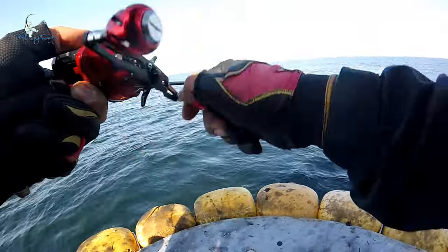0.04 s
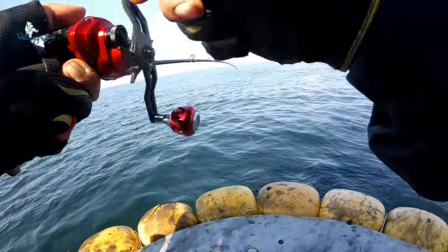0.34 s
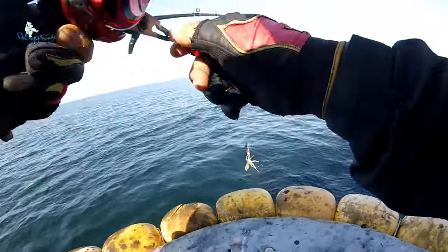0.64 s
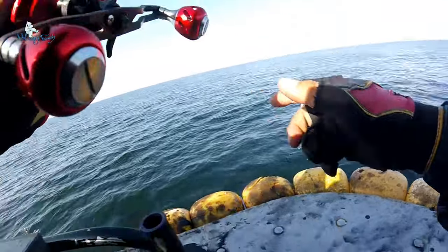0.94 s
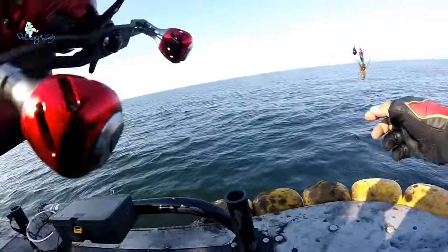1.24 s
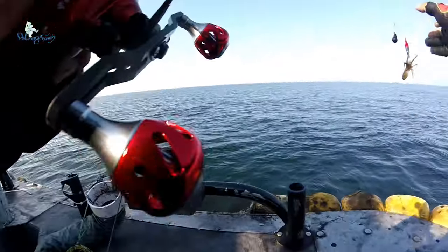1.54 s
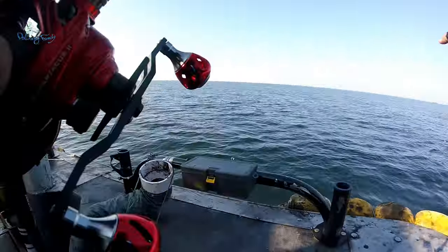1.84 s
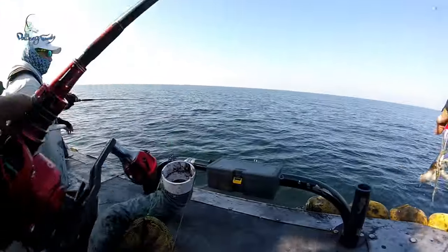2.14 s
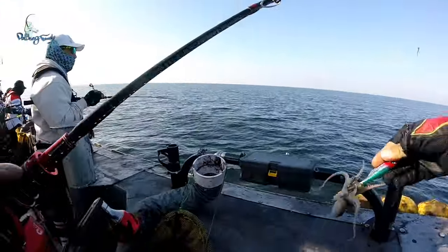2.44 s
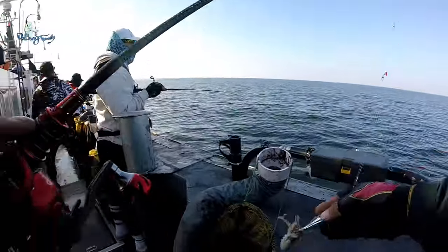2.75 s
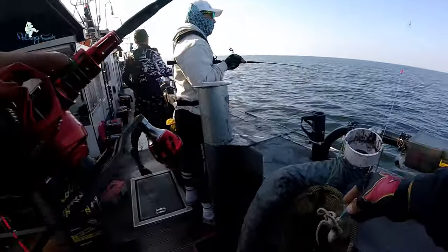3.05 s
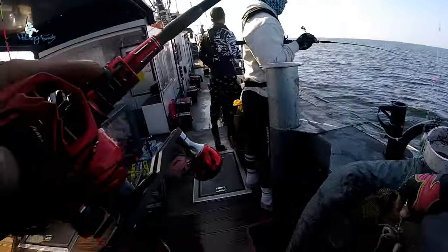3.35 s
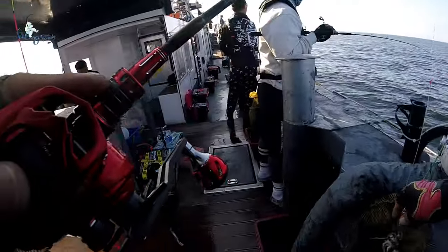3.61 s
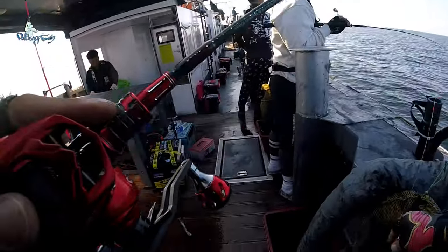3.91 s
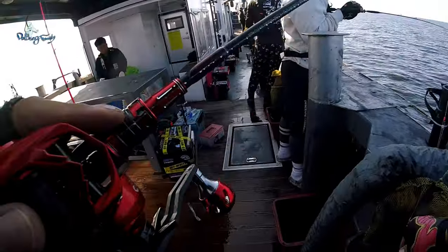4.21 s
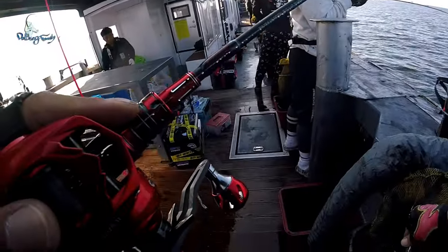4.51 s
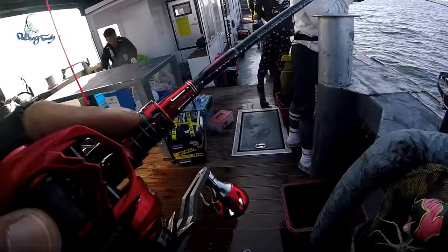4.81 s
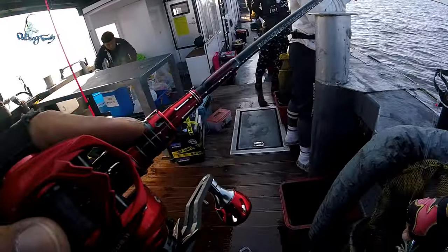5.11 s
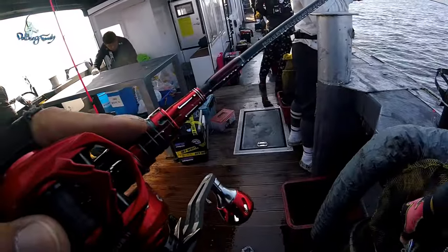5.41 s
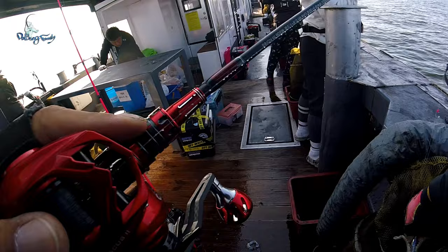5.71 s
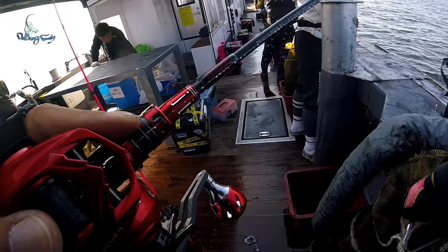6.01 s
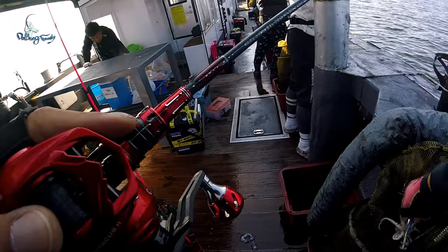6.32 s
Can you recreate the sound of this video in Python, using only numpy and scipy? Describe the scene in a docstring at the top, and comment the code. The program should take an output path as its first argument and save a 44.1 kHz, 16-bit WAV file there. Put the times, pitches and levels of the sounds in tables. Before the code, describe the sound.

On the deck of a fishing boat, the low drone of an idling diesel runs throughout, under a breeze and a faint fizz of ripples. Early on there is a brief, soft reel whine, a gust on the microphone and one sharp snap of the reel, followed by splashing slaps against the hull. Then the machinery becomes fuller, with close sleeve rustles, scattered light tackle ticks and a final short metallic jingle.

```python
"""A six-cylinder diesel idles below the deck of a fishing boat; its periodic firings drone and knock.
Wind eddies buffet the microphone, ripples fizz, and waves slap the hull, exciting trapped air and plating.
Close by, an angler's reel whines, a jacket rustles by friction, and drops ping. Small impacts set the
tackle ringing: it ticks, snaps once and finally jingles. The machinery grows as the angler turns to it."""
import sys
import numpy as np
from scipy import signal
from scipy.fft import rfft, irfft
from scipy.io import wavfile
from scipy.ndimage import uniform_filter1d

SR = 44100
rng = np.random.default_rng(int(sys.argv[2]) if len(sys.argv) > 2 else 0)


def wav_record(signal):
    """Record a signal, one row per channel, as 16-bit PCM in the file named by sys.argv[1]."""
    frames = np.transpose(np.atleast_2d(signal))
    bounded = np.clip(frames, -1, 1)
    # unit amplitude maps onto the largest positive 16-bit level
    quanta = np.round(bounded * 32767).astype(np.int16)
    wavfile.write(sys.argv[1], SR, quanta)


N = 284886
T = np.arange(N) / SR
FIRING_HZ, CYLINDERS = 30.04, 6
CONTACT_HZ = 10500  # soft contact limits the treble of the tackle

# Exhaust overtones and the lines between them: (order [multiple of the cycle rate], relative level [dB])
EXHAUST_ORDERS = [(14, -30.5), (15, -34.5), (16, -40), (17, -45.5), (18, -35), (19, -40), (20, -40.5),
                  (23, -44), (24, -39), (27, -42.5), (29, -36.5), (30, -40), (31, -46), (32, -45.5),
                  (36, -45), (39, -51.5), (42, -51.5), (48, -53), (54, -49), (78, -52.5), (84, -53.5),
                  (90, -53), (159, -62), (174, -66), (176, -65), (235, -66)]
# The octave of the exhaust note, swelling and sinking as the angler moves: (time [s], level [dB])
OCTAVE_LEVEL = [(0, -27.5), (0.6, -36), (0.9, -35), (1.55, -20), (1.9, -22), (2.2, -25.5), (2.65, -26),
                (3.0, -20.5), (3.35, -30.5), (4.3, -21), (4.75, -20), (5.2, -24), (6.46, -25)]
# One exhaust line that booms most on the seaward side: (time [s], level [dB])
BOOM_LEVEL = [(0, -30.5), (1.0, -33.5), (2.6, -37), (6.46, -38)]
# Spectrum of clatter and combustion noise: (frequency [Hz], relative density [dB])
MACHINERY_SPECTRUM = [(90, -3), (150, 2), (195, 5), (240, -2.5), (275, 1), (320, -3.5), (370, -4),
                      (440, -5.5), (500, -11.5), (570, -15), (690, -15.5), (800, -15.5), (1100, -22.5),
                      (1600, -29.5), (2100, -28), (3300, -34), (7000, -58.5)]
# Steady tones beside the engine: (frequency [Hz], relative level [dB])
HUM_TONES = [(272.2, -48), (362.7, -48)]
# Spectra of the breeze and the gust: (frequency [Hz], relative density [dB])
BREEZE_SPECTRUM = [(10, -30), (20, -2), (33, -14.5), (39, -0.5), (54, -2.5), (75, -13), (115, -13.5),
                   (170, -24.5), (260, -26), (500, -59), (1500, -74)]
GUST_SPECTRUM = [(10, -30), (25, -7.5), (54, 0.5), (80, -2.5), (115, -9), (170, -15), (260, -29.5),
                 (500, -55), (1500, -77)]
# The strongest eddies of the gust: (time [s], level before windowing [dB], frequency [Hz])
EDDIES = [(0.916, -8.5, 62), (0.949, -16, 76), (1.05, -11.5, 95), (1.11, -9.5, 134), (1.152, -10, 93),
          (1.224, -11, 76.4), (1.29, -13.5, 84)]
# Spectrum of fizzing ripples: (frequency [Hz], relative density [dB])
RIPPLE_SPECTRUM = [(300, 20), (1500, 4.5), (2600, -22), (4000, 3), (4900, 8), (5700, 5.5), (6700, -1),
                   (9400, -2.5), (11000, -13.5), (13000, -26), (15000, -42)]
# Reel whine, higher with each push of the crank: (time [s], frequency [Hz], level [dB])
WINDING = [(0.015, 1980, -48), (.04, 1980, -52), (.052, 2100, -63), (.11, 2470, -63), (.165, 2460, -63),
           (.205, 2260, -57), (.25, 2200, -66), (.31, 2540, -63), (.4, 2607, -64), (.44, 2330, -78),
           (.51, 2140, -69), (.555, 2196, -54), (.58, 2450, -63), (.605, 2260, -58)]
# Spectrum of rubbing fabric, shared by other hisses: (frequency [Hz], relative density [dB])
HISS_SPECTRUM = [(700, -10), (1800, 1.5), (2800, 1), (4000, -3), (5400, 2.5), (6800, -8), (9700, -9.5),
                 (11000, -29.5), (15000, -37.5)]
# Soft hisses: jacket rubs, the reel's whirr at the start, and spray after the slaps:
# (time [s], level [dB], rise [s], decay [s])
SOFT_HISSES = [(.1, -63, 0.29, 0.21), (.56, -60.5, 0.03, 0.18), (.79, -58, 0.069, 0.026),
               (1.228, -47.5, 0.048, 0.041), (2.0, -51, 0.12, 0.047), (2.21, -52, 0.096, 0.19),
               (2.72, -42, 0.11, 0.17), (3.23, -50, .02, 0.028), (3.481, -51, .016, 0.02),
               (3.9, -53.5, 0.093, 0.096), (4.275, -45, 0.06, 0.11), (4.729, -37, 0.004, 0.02),
               (4.907, -48, 0.0063, 0.014), (4.962, -51, 0.0036, 0.017), (5.134, -40, 0.0031, 0.026),
               (5.473, -48.5, 0.015, 0.018), (5.715, -46.5, 0.034, 0.039), (6.353, -47.5, .002, 0.032),
               (6.412, -42.5, .0076, 0.046)]
# Gliding rasps of the sleeve, and one quick falling zip of fishing line:
# (time [s], level [dB], rise [s], decay [s], frequency [Hz], glide [octaves/s], bandwidth [Hz])
GLIDING_RASPS = [(2.638, -43, 0.023, 0.06, 3290, -2, 1000), (2.75, -42, 0.06, 0.055, 3280, 1, 350),
                 (2.765, -46.5, .045, .06, 2306, -0.5, 1300), (3.461, -40, 0.0031, .007, 5930, -24, 700),
                 (3.483, -44, 0.02, 0.022, 3205, -8, 2980), (3.493, -45, 0.022, .015, 1498, -7.5, 2000)]
# Ticks of line and swivels: (time [s], relative peak [dB], frequency [Hz], bandwidth [Hz])
LINE_TICKS = [(.164, -43, 9600, 1500), (.262, -44, 9600, 1500), (.552, -46, 4700, 2510),
              (.587, -46, 3950, 1500), (.639, -35.5, 2860, 3480), (.64, -52, 5600, 2500),
              (0.674, -43.5, 2580, 2400), (1.075, -35, 3000, 2200), (1.613, -35.5, 1850, 2400),
              (1.867, -48, 2000, 2000), (2.025, -40, 1900, 2400), (2.238, -31, 3900, 4500),
              (2.94, -45, 9000, 1500), (3.038, -37, 8300, 2520), (3.039, -41, 5200, 900),
              (3.055, -41, 6100, 900), (3.072, -41, 5600, 3500), (3.091, -38.5, 6170, 3500),
              (3.15, -50, 8700, 1200), (3.289, -37.5, 4880, 3000), (3.338, -42, 5060, 1500),
              (3.821, -42.5, 8000, 1530), (3.889, -47, 8800, 1200), (3.944, -51, 8100, 900),
              (3.966, -48, 9500, 1500), (4.114, -37.5, 7550, 3500), (4.814, -39, 4930, 900),
              (4.869, -41, 7950, 1500), (4.934, -42, 6500, 2000), (5.05, -46, 4850, 700),
              (5.202, -33, 4900, 2200), (5.329, -37, 7200, 2500), (6.286, -45, 6200, 1200)]
# Waves striking the hull: (time [s], level [dB], rise [s], cavity frequency [Hz], hardness [dB])
WAVE_SLAPS = [(0.235, -31.5, 0.0065, 590, -10.5), (0.252, -24, 0.014, 267, -20),
              (0.428, -29.5, 0.011, 255, -28), (0.46, -34, 0.015, 286, -7),
              (1.423, -28.5, 0.0054, 517, -12), (1.453, -21, 0.0069, 730, -3.5),
              (1.47, -25.5, 0.02, 312, -5.5), (1.689, -23.5, 0.0078, 690, -2.5),
              (1.918, -23.5, 0.0056, 566, -3)]
# Modes of the hull plating: (frequency [Hz], bandwidth [Hz], relative gain [dB])
HULL_MODES = [(285, 21, 6.5), (403, 19, 6), (510, 14, 2), (618, 25, 3), (703, 10, 1), (838, 36, 1.5),
              (1016, 68, -5.5), (1205, 43, -8.5), (2150, 670, -27)]
# Spectrum of thrown spray: (frequency [Hz], relative density [dB])
SPRAY_SPECTRUM = [(500, 12.5), (1300, -7), (2300, 8), (3000, 5), (4000, 2), (5500, 4), (6800, -9),
                  (9500, -14.5), (11000, -39), (15000, -39)]
# Large bubbles in the slaps: (time [s], peak [dB], frequency [Hz])
SLAP_BUBBLES = [(.245, -34, 638), (.25, -28, 272), (.425, -24.5, 284), (1.455, -24.5, 1110),
                (1.457, -37, 1145), (1.455, -29, 840), (1.465, -22, 316.6), (1.69, -36, 1045),
                (1.916, -29.5, 713)]
# Spectrum of water falling back: (frequency [Hz], relative density [dB])
PATTER_SPECTRUM = [(250, 6.5), (750, 4), (1200, -4.5), (1600, -8), (2400, -12.5), (3800, -16), (5400, -12),
                   (6800, -18), (9500, -20.5), (11200, -43)]
# Blows of the reel snapping shut: (time [s], peak before low-pass [dB])
REEL_BLOWS = [(1.0797, -8), (1.0818, -14), (1.084, -32)]
# Modes of the reel: (frequency [Hz], relative level [dB], 60 dB decay time [s])
REEL_MODES = [(950, -17, .006), (2080, 2, 0.0019), (3540, 4, 0.0023), (5270, 11, 0.0022),
              (7760, 7.5, 0.0028), (12000, 2, 0.0015), (13800, -3, .002)]
# Surges of foam along the side: (time [s], level [dB], rise [s], decay [s], hold [s])
FOAM_SURGES = [(2.21, -56, 0.07, 0.12, 0.0095), (2.675, -33, 0.053, 0.094, 0.033),
               (2.75, -35.5, .02, 0.038, 0.022), (2.83, -32.5, 0.022, 0.019, .015)]
# Spectrum of foam: (frequency [Hz], relative density [dB])
FOAM_SPECTRUM = [(200, 3.5), (400, 3), (750, 2), (1020, -5), (1200, -1), (1600, -14.5), (2300, -7),
                 (2800, -13), (3250, -11.5), (3900, -14), (5300, -13.5), (6800, -26), (9500, -40),
                 (11200, -57)]
# Touches of a swivel on the sinker: (time [s], peak before low-pass [dB])
SWIVEL_TOUCHES = [(6.412, -26), (6.417, -45), (6.425, -29), (6.435, -35), (6.451, -34)]
# Modes of the swivel: (frequency [Hz], relative level [dB], 60 dB decay time [s])
SWIVEL_MODES = [(5130, 7, 0.059), (5240, -7, 0.049), (5630, 6, 0.051), (6010, -1, 0.053), (6470, -12, .03),
                (7600, -5, 0.05), (8250, -8, 0.04), (9900, -10, 0.043)]


def undb(db):
    """Convert decibels to an amplitude ratio."""
    return 10 ** (np.asarray(db) / 20)


def unit(x):
    """Normalise to rms 1."""
    return x / np.sqrt(np.mean(x ** 2))


def curve(rows):
    """Linear interpolation of (time [s], value) rows."""
    return np.interp(T, *np.transpose(rows))


def noise():
    """Gaussian white noise."""
    return rng.standard_normal(N)


def wander(rate):
    """Smoothed random modulation of rms 1, with `rate` new values a second."""
    k = int(SR / rate)
    steps = np.repeat(noise()[:N // k + 1], k)
    return unit(uniform_filter1d(uniform_filter1d(steps, k), k)[:N])


def colour(x, spectrum):
    """Spectral shaping by a (frequency [Hz], level [dB]) outline, to rms 1."""
    hz, db = np.transpose(spectrum)
    bins = np.maximum(np.fft.rfftfreq(N, 1 / SR), 1)
    gain = undb(np.interp(np.log(bins), np.log(hz), db))
    return unit(irfft(rfft(x) * gain, N))


def resonate(x, hz, width):
    """A second-order resonance with gain 1 at its centre."""
    return signal.lfilter(*signal.iirpeak(hz, hz / width, fs=SR), x)


def resonate_twice(x, hz, width):
    """Two equal resonances in cascade, for steeper skirts."""
    return resonate(resonate(x, hz, width), hz, width)


def lowpass(x, hz):
    """A fourth-order low-pass."""
    return signal.sosfilt(signal.butter(4, hz, fs=SR, output="sos"), x)


def grains(rate, spread_db):
    """Shot noise: about `rate` tiny impacts a second, of unequal size."""
    size = undb(spread_db * np.minimum(rng.exponential(size=N), 5))
    return noise() * size * (rng.random(N) < rate / SR)


def swell(at, rise, decay, hold=0):
    """An envelope with a Gaussian rise to 1, an optional hold and an exponential decay."""
    return np.exp(-(np.minimum(T - at, 0) / rise) ** 2 - np.maximum(T - at - hold, 0) / decay)


def swells(rows):
    """Power sum of (time [s], level [dB], rise [s], decay [s], optional hold [s]) envelopes."""
    return np.sqrt(sum((undb(db) * swell(at, *shape)) ** 2 for at, db, *shape in rows))


def ring(modes, rise=1e-5):
    """Free vibration of damped modes after a blow that builds over `rise` seconds."""
    t = T[:SR // 4]
    ringing = sum(undb(db) * np.sin(2 * np.pi * hz * t) * 1000 ** (-t / t60) for hz, db, t60 in modes)
    return ringing * (1 - np.exp(-(t / rise) ** 2))


def add(out, at, peak_db, sound):
    """Superpose a sound at a given time and peak level."""
    part = out[int(at * SR):][:len(sound)]
    part += undb(peak_db) * sound[:len(part)] / np.abs(sound).max()


def facing_db(seaward_db=-5, inboard_db=-0.11, midpoint_s=2.55, turn_s=1.73):
    """Acoustic shadow: the body shades the machinery less as the angler turns from sea to deckhouse."""
    turned = (1 + np.tanh(2 * (T - midpoint_s) / turn_s)) / 2
    return seaward_db + (inboard_db - seaward_db) * turned


def exhaust(cycle, puff_lag_s=0.004087, boom_order=21, coherent_below_hz=200, waver_db=1.25):
    """Harmonic series: each firing emits a puff of gas; unequal cylinders add lines between overtones."""
    puff = cycle - puff_lag_s * FIRING_HZ / CYLINDERS
    out = undb(-19 + 0.31 * facing_db()) * np.cos(2 * np.pi * CYLINDERS * cycle)
    out += undb(curve(OCTAVE_LEVEL)) * np.cos(2 * np.pi * CYLINDERS * (cycle + puff))
    out += undb(curve(BOOM_LEVEL)) * np.cos(2 * np.pi * (boom_order * puff + rng.random()))
    shadow_db = 0.73 * facing_db()
    for order, db in EXHAUST_ORDERS:
        # Only low firing overtones stay in phase; the hull scatters the higher ones.
        scattered = order % CYLINDERS > 0 or order * FIRING_HZ / CYLINDERS > coherent_below_hz
        phase = 2 * np.pi * (order * puff + rng.random() * scattered)
        out += undb(db + shadow_db + waver_db * wander(2.1)) * np.cos(phase)
    return np.sqrt(2) * out


def knocks(cycle, scatter_db=6, hull_cutoff_hz=445):
    """Structure-borne sound: uneven firings thud through the hull and rattle loose fittings."""
    lag, jitter, decay = 0.023, 0.12, 0.27  # fractions of the firing period
    firing = CYLINDERS * cycle - lag + jitter * wander(FIRING_HZ)
    strength = undb(scatter_db * rng.uniform(-1, 1, N))[np.floor(firing).astype(int)]
    force = lowpass(noise() * strength * np.exp(-(firing % 1) / decay), hull_cutoff_hz)
    thud = unit(resonate_twice(force, hz=165, width=150))
    rattle = unit(resonate_twice(force, hz=395, width=110))
    return undb(-43) * thud + undb(-46 + 1.4 * facing_db()) * rattle


def machinery(cycle, combustion_db=7, flicker_db=1.8):
    """Periodic and random noise: valves and pistons repeat each cycle amid combustion; injectors ring."""
    cycle_samples = int(SR * CYLINDERS / FIRING_HZ)
    clatter = noise()[(cycle % 1 * cycle_samples).astype(int)]
    rumble = colour(clatter + undb(combustion_db) * noise(), MACHINERY_SPECTRUM)
    injectors = unit(resonate(resonate(noise(), hz=2355, width=220), hz=2340, width=290))
    injectors *= undb(flicker_db * wander(24))
    # The body shades short wavelengths more than long ones.
    return undb(-34 + facing_db()) * rumble + undb(-58 + 7 * facing_db()) * injectors


def hum(waver_db=3):
    """Beating: two thin tones, as of a pump, interfere with nearby engine overtones."""
    return sum(undb(db + facing_db() + waver_db * wander(5)) * np.sqrt(2) * np.sin(2 * np.pi * hz * T)
               for hz, db in HUM_TONES)


def wind(breeze_db=-27.5, gust_db=-22, gust_flutter_db=3, flutter_db=1, eddy_cycles=0.67):
    """Turbulent pressure: a breeze and one gust rumble at the microphone; each eddy pushes and pulls."""
    gust = swell(at=0.915, rise=0.02, decay=0.26, hold=0.49)
    gust *= undb(gust_db + gust_flutter_db * wander(27.98))
    breeze = undb(breeze_db) * colour(noise(), BREEZE_SPECTRUM)
    out = (breeze + gust * colour(noise(), GUST_SPECTRUM)) * undb(flutter_db * wander(9.1))
    for at, db, hz in EDDIES:
        turns = (T - at) * hz
        out -= undb(db) * np.sin(2 * np.pi * turns) * np.exp(-(turns / eddy_cycles) ** 2)
    return out


def ripples(swell_db=0.6):
    """Incoherent summation: countless ripples merge into a nearly steady fizz."""
    fizz = colour(noise() + grains(rate=2200, spread_db=5), RIPPLE_SPECTRUM)
    return fizz * undb(-53.5 + swell_db * wander(5.5) + 0.5 * facing_db())


def reel_whine(octave_db=-4, flicker_db=4, jitter=0.036, roughen_s=0.1):
    """Frequency modulation: a tone and its octave follow the winding speed; jitter makes them scratchy."""
    times, hz, db = np.transpose(WINDING)
    roughness = np.clip((T - times[0]) / roughen_s, 0, 1)
    pitch = np.interp(T, times, hz) * (1 + jitter * roughness * wander(300))
    phase = 2 * np.pi * np.cumsum(pitch) / SR
    envelope = undb(np.interp(T, times, db) + flicker_db * wander(62))
    envelope *= swell(times[0], rise=0.006, decay=0.025, hold=np.ptp(times))
    return envelope * (np.sin(phase) + undb(octave_db) * roughness * np.sin(2 * phase))


def hisses():
    """Shot noise: jacket fabric slips in tiny steps; the same hiss gives the reel's whirr and late spray."""
    fidget = undb(-64 + 2.6 * facing_db() + 1.5 * wander(10))  # faint stirring, more after the turn
    hiss = colour(grains(rate=9000, spread_db=1.5), HISS_SPECTRUM)
    return hiss * np.hypot(swells(SOFT_HISSES), fidget)


def line_ticks(gain_db=-1, decay_cycles=150):
    """Damped resonance: line and swivel ticks fade in a set number of cycles, so low ones last longer."""
    out = np.zeros(N)
    t = T[:SR // 10]
    for at, db, hz, width in LINE_TICKS:
        scratch = noise()[:len(t)] * 1000 ** (-t * hz / decay_cycles)
        add(out, at, db + gain_db, resonate_twice(scratch, hz, width))
    return lowpass(out, CONTACT_HZ)


def wave_slaps(decay_s=0.033, splash_db=-13.5, smack_db=-24):
    """Cavity resonance: each wave traps air; harder ones drive the plating more and throw more spray."""
    out = np.zeros(N)
    spray = colour(noise(), SPRAY_SPECTRUM)
    push = lowpass(noise(), hz=2600)
    plating = unit(sum(undb(db) * resonate(push, hz, width) for hz, width, db in HULL_MODES))
    for at, db, rise, hz, hardness_db in WAVE_SLAPS:
        cavity = unit(resonate_twice(noise(), hz, width=0.71 * hz))
        envelope = swell(at, rise, decay_s)
        thump = unit((cavity + undb(hardness_db) * plating) * envelope) * np.sqrt(np.mean(envelope ** 2))
        splash = undb(splash_db) * swell(at, rise, 1.5 * decay_s)
        smack = undb(smack_db) * swell(at, rise=0.003, decay=decay_s)  # the bright first contact
        out += undb(db) * (thump + undb(hardness_db) * spray * np.hypot(splash, smack))
    return out


def bubbles(rise_s=0.0068, decay_s=0.028):
    """Volume oscillation: large bubbles pinched off by a slap ring briefly at their natural frequency."""
    return sum(undb(db) * swell(at, rise_s, decay_s) * np.sin(2 * np.pi * (hz * T + rng.random()))
               for at, db, hz in SLAP_BUBBLES)


def patter(gain_db=-18, lag_s=0.062, rise_s=0.12, decay_s=0.35):
    """Shot noise: water thrown by each slap falls back as many small impacts."""
    showers = [(at + lag_s, db + hardness_db + gain_db, rise_s, decay_s)
               for at, db, _, _, hardness_db in WAVE_SLAPS]
    return colour(grains(rate=7000, spread_db=2.5), PATTER_SPECTRUM) * swells(showers)


def reel_snap(rise_s=0.00053, buzz_db=-31):
    """Impact excitation: the reel shuts and its modes ring; loose parts buzz after the hardest blow."""
    out = np.zeros(N)
    for at, db in REEL_BLOWS:
        add(out, at, db, ring(REEL_MODES, rise_s))
    hardest_at = max(REEL_BLOWS, key=lambda blow: blow[1])[0]
    buzz = colour(noise(), HISS_SPECTRUM) * swell(hardest_at + rise_s, rise=0.0012, decay=0.0043)
    return lowpass(out, CONTACT_HZ) + undb(buzz_db) * buzz


def droplets(count=60, start_s=1.9, low_hz=4700, high_hz=10000, t60=0.049):
    """Impact resonance: scattered drops ping on deck and water, each in its own narrow band."""
    out = np.zeros(N)
    t = T[:SR // 20]
    for when, pitch, size in rng.random((count, 3)):
        hz = low_hz * (high_hz / low_hz) ** pitch
        splat = noise()[:len(t)] * 1000 ** (-t / t60)
        db = -55 - 3 * np.log(max(size, 0.05))  # most drops are tiny, a few stand out
        add(out, start_s + when * (T[-1] - start_s), db, resonate_twice(splat, hz, width=hz / 8))
    return out


def foam(flicker_db=2.5):
    """Amplitude-modulated shot noise: foam washes along the hull in surges."""
    froth = colour(grains(rate=20000, spread_db=1.5), FOAM_SPECTRUM)
    return froth * swells(FOAM_SURGES) * undb(flicker_db * wander(50))


def rasps():
    """Sliding friction: the sleeve rasps and the fishing line zips once, each in a gliding noise band."""
    out = np.zeros(N)
    for at, db, rise, decay, hz, glide, width in GLIDING_RASPS:
        pitch = hz * 2 ** np.clip(glide * (T - at), -1, 1)
        carrier = np.cos(2 * np.pi * np.cumsum(pitch) / SR)
        band = unit(lowpass(noise(), width / 2) * carrier)
        out += undb(db) * band * swell(at, rise, decay)
    return out


def swivel_jingle(skid_s=0.0075):
    """Inharmonic modes: a swivel skids on the sinker at each touch and rings on."""
    out = np.zeros(N)
    t = T[:SR // 10]
    for at, db in SWIVEL_TOUCHES:
        skid = noise()[:len(t)] * np.exp(-t / skid_s)
        add(out, at, db, signal.fftconvolve(skid, ring(SWIVEL_MODES)))
    return lowpass(out, CONTACT_HZ)


def scene(speed_drift=0.00046, first_firing_s=0.004):
    """Superposition: all sources sum at one microphone, while the governed engine barely drifts."""
    clock = np.cumsum(1 + speed_drift * wander(2.013)) / SR
    cycle = (clock - first_firing_s) * FIRING_HZ / CYLINDERS  # engine cycles elapsed
    engine = exhaust(cycle) + knocks(cycle) + machinery(cycle) + hum()
    weather = wind() + ripples() + patter() + foam() + wave_slaps() + bubbles()
    nearby = hisses() + rasps() + reel_whine() + line_ticks() + swivel_jingle() + reel_snap()
    return (engine + weather + nearby + droplets())[None]


def record(dry, cutoff_hz=15200, fade_s=0.003):
    """Band limiting: a steep low-pass removes the top treble, and short fades soften both ends."""
    fades = np.minimum(np.minimum(T, T[-1] - T) / fade_s, 1)
    return signal.sosfilt(signal.ellip(8, 0.2, 70, cutoff_hz, fs=SR, output="sos"), dry * fades)


dry = scene()
out = record(dry)
wav_record(out)
```